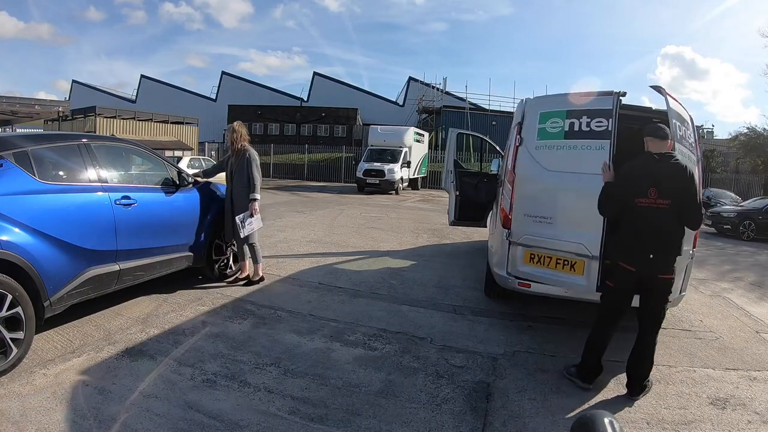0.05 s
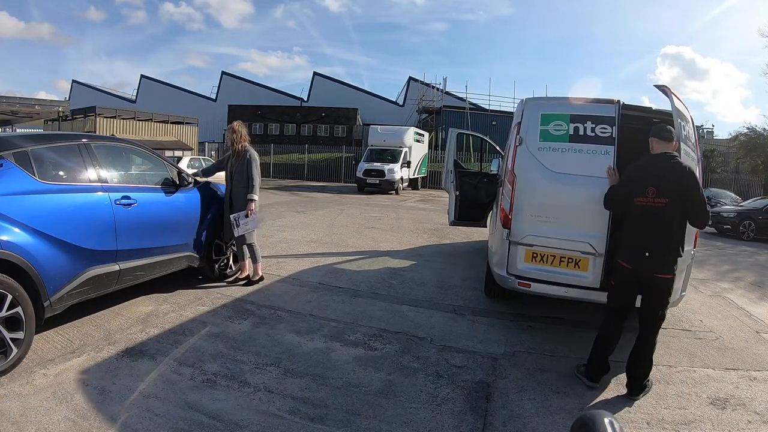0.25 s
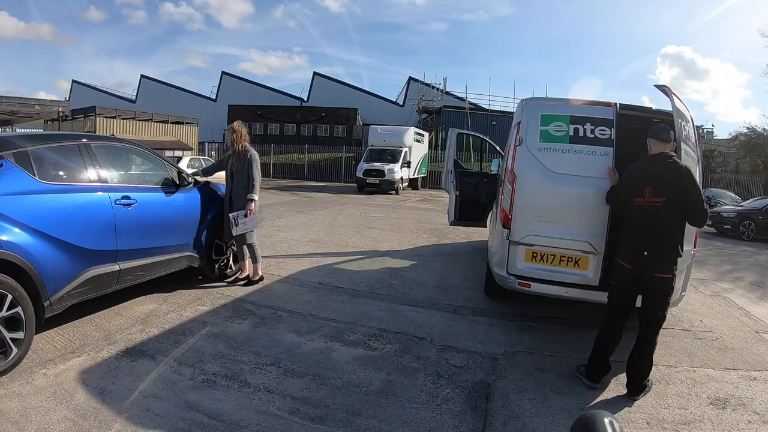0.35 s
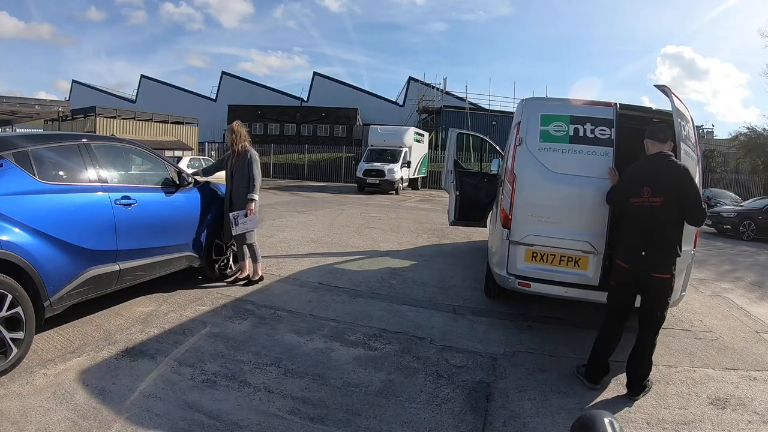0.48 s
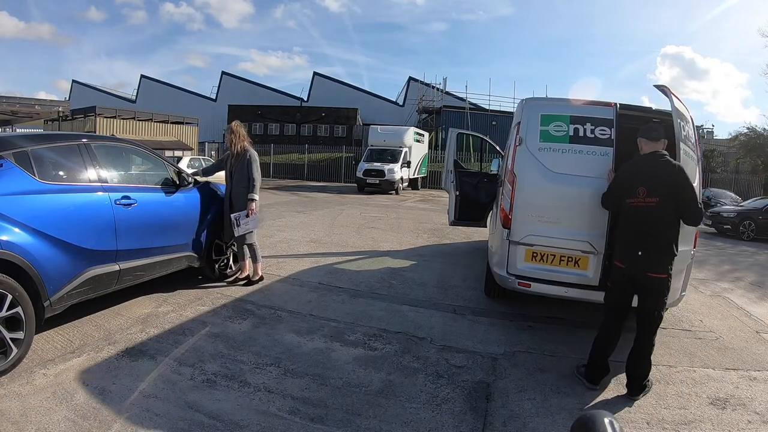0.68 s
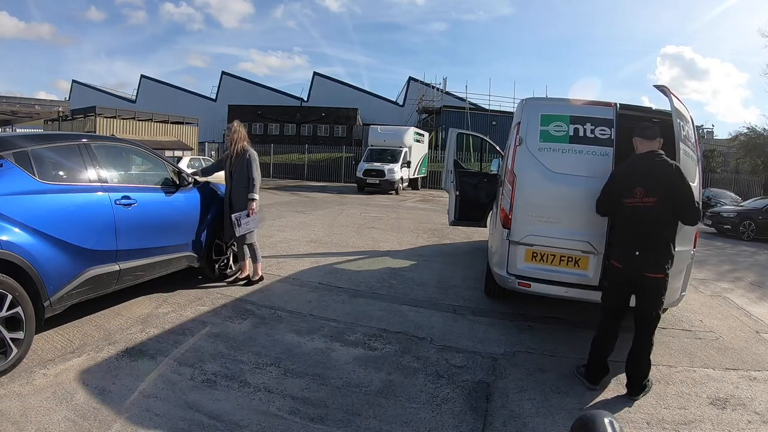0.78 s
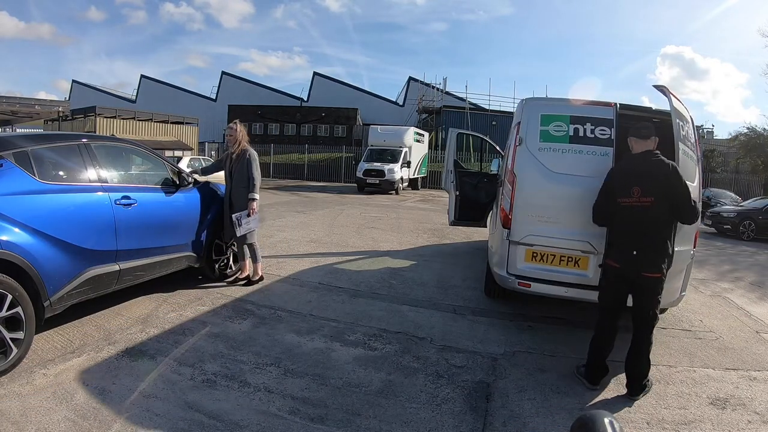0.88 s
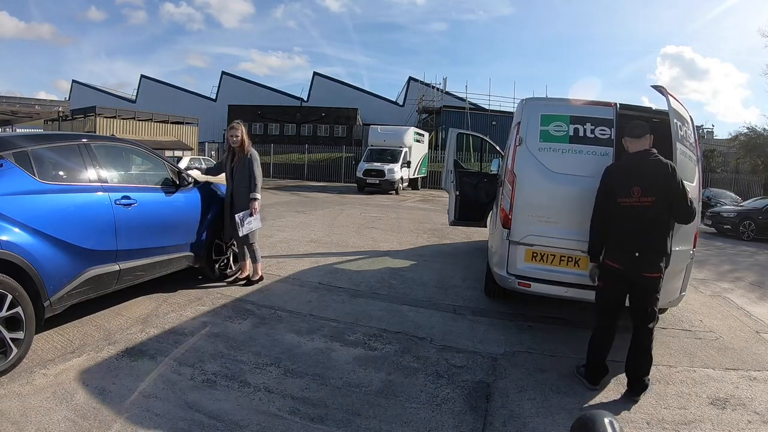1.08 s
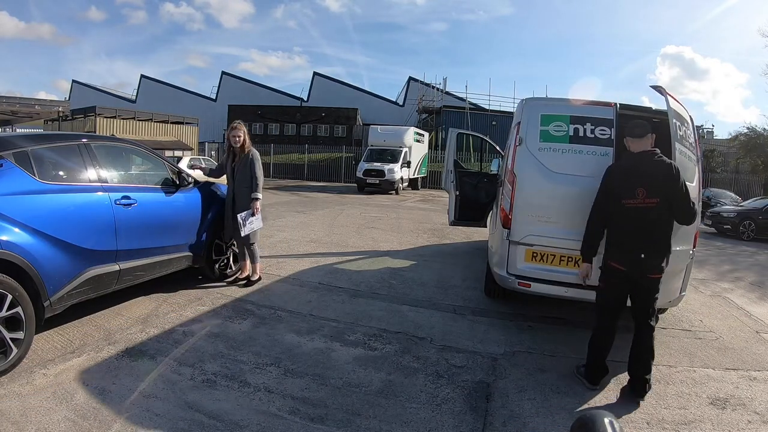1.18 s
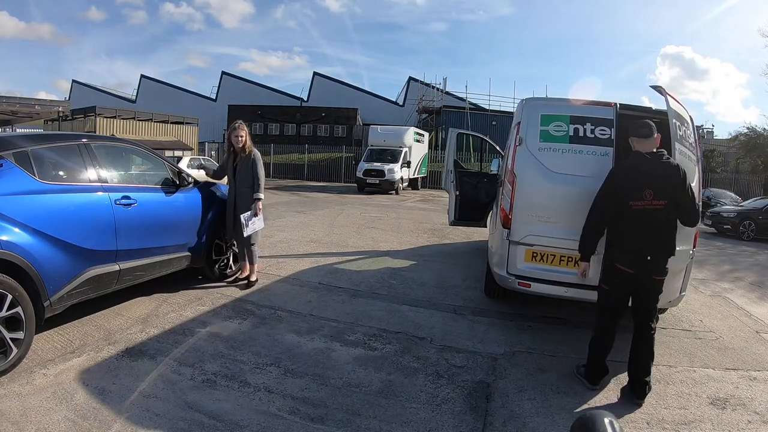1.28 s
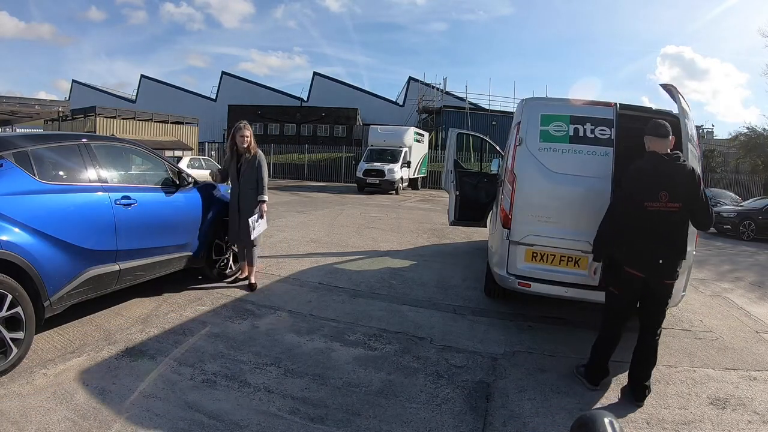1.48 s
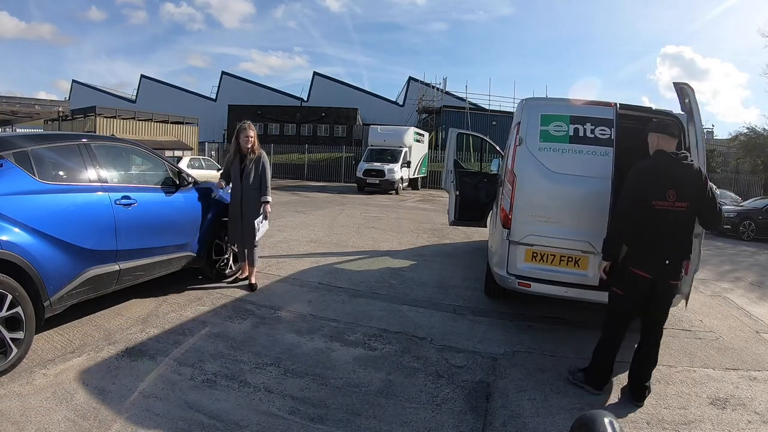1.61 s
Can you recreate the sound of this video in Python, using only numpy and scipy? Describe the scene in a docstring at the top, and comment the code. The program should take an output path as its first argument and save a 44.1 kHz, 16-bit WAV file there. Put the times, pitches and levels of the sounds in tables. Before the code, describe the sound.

A van's rear door slams in an open yard. Low engine hum, one motor falling in pitch, and distant traffic run throughout. Two faint metallic ticks come around 0.2 s, then at 0.33 s a sharp latch crack bursts into a deep, hollow boom with ringing, rattling steel, slightly right, fading by about 0.9 s. The ducked background creeps back; a very soft scuff comes near 1.56 s.

```python
"""Van door slammed in an open yard

A slowing engine, an idling one and distant traffic are wavering tones and coloured noise.
Two light handle ticks and a fainter third precede the latch's crack: decaying noise bursts and modes.
The load space booms and the panels ring as damped sines, to the right; the shell rattles as banded noise.
A soft scuff follows; the recorder's gain ducks at the slam and creeps back."""
import sys
import numpy as np
from scipy import signal
from scipy.fft import rfft, irfft
from scipy.io import wavfile
from scipy.ndimage import uniform_filter1d

SR = 44100
rng = np.random.default_rng(int(sys.argv[2]) if len(sys.argv) > 2 else 0)


def persist_wave(psi):
    """Save psi, clipped to +-1, as 16-bit WAV."""
    counts = np.round(np.clip(psi, -1, 1) * 32767).astype(np.int16)
    wavfile.write(sys.argv[1], SR, np.atleast_2d(counts).T)


N = 72765  # length in samples

# Levels in dB are nominal: before the onset envelopes and the recorder. Colours in dB per Hz are relative.

# A vehicle losing revs. Each row: time in seconds, firing frequency in Hz, level in dB.
SLOWING_ENGINE = [(0, 99.2, -38.5), (0.219, 86.14, -28), (0.291, 84.7, -37.5), (0.601, 73.55, -24),
                  (0.781, 68.6, -28.5), (.95, 63.9, -32), (1.249, 67.5, -27), (1.45, 66, -37.5),
                  (1.65, 55.4, -36)]
# Hum of an idling engine. Each row: frequency in Hz, level in dB.
IDLING_ENGINE = [(129.5, -34.5), (256, -56.5), (309, -51), (618, -68)]
# Spread of both engines' pitch (fraction of the frequency) and level (dB).
HUM_WAVER, HUM_FLUTTER_DB = 0.0078, 1.5
# Colour of distant traffic. Each row: frequency in Hz, density in dB per Hz.
TRAFFIC_COLOUR = [(20, -8.5), (35, 0), (70, -0.5), (140, -4), (200, -12), (320, -18), (550, -25.5),
                  (1100, -23.5), (2000, -31), (2700, -39), (3400, -41), (4600, -49.5), (6200, -43),
                  (8000, -54.5), (14000, -67)]
TRAFFIC_DB, SWELL_DB = -32, 1.09  # level, and the spread of its slow swell
# Stereo balance of the yard. Each row: frequency in Hz, left minus right in dB.
YARD_BALANCE = [(100, -1), (300, -4), (700, -6), (1500, -2), (4200, -2.5), (7000, 0)]
# Likeness of the yard's two sides. Each row: frequency in Hz, likeness from 0 to 1.
YARD_LIKENESS = [(50, .55), (240, 0.95), (470, .67), (920, 0), (1800, .05), (3600, 0.6), (7000, 0.2)]

# Light ticks of the door hardware. Each row: start in seconds, level in dB, t60 in seconds.
HARDWARE_TICKS = [(0.1753, -28.5, 0.0057), (0.2, -29.5, 0.0073), (.213, -49, 0.028)]
# Colour of the ticks. Each row: frequency in Hz, density in dB per Hz.
TICK_COLOUR = [(1000, -17.5), (2500, -2), (4000, -8.5), (6300, 5.5), (8000, -7.5), (14000, -33.5)]
TICK_TAIL_DB, TICK_TAIL_T60 = -26.5, 0.2  # tail level relative to its tick, and decay in seconds

# Metal contacts of the closing latch.
# Each row: start in seconds, bright click level in dB, clack level in dB, t60 in seconds.
LATCH_CONTACTS = [(.3310, -20.5, -22, 0.027), (.3370, -18, -19, 0.022), (0.3395, -28, -13, .026),
                  (0.3475, -20, -23, .03)]
# Colour of the bright click. Each row: frequency in Hz, density in dB per Hz.
CLICK_COLOUR = [(1500, -2), (3500, -2.5), (5000, -7.5), (6300, 3.5), (7400, 3.5), (9000, -21), (14000, -22)]
# Colour of the lower clack. Each row: frequency in Hz, density in dB per Hz.
CLACK_COLOUR = [(300, -1), (650, 6), (900, -15), (1050, -1), (1200, -11), (1420, -1.5), (1730, 3),
                (1950, -5), (2300, -8.5), (2700, -5.5), (3400, -0.5), (5000, -16.5), (12000, -44.5)]
# Modes of the striker and door frame. Each row: frequency in Hz, level in dB, t60 in seconds.
STRIKER_MODES = [(632, -21.5, 0.12), (1051, -22.5, 0.13), (1429, -17.5, .09), (1734, -18, 0.043),
                 (2305, -20, 0.079), (3376, -24.5, 0.058), (6550, -30, 0.1), (7100, -27, 0.044)]
STRIKER_START_S, STRIKER_RISE_S = 0.3412, 0.00078

# Modes of the load space's air and the door leaf. Each row: frequency in Hz, level in dB, t60 in seconds.
BOOM_MODES = [(42.2, -4.5, 0.82), (80.04, -3, 0.6), (105.1, 5, 0.29), (112.37, 5.5, 0.2),
              (137.6, -10, 0.46), (151.2, -7, 0.44)]
BOOM_START_S, BOOM_RISE_S = 0.3327, 0.028
# Modes of the body's steel panels. Each row: frequency in Hz, level in dB, t60 in seconds.
PANEL_MODES = [(185.5, -18.5, .36), (206.2, -18.5, .33), (226, -15, 0.33), (253.5, -11.5, 0.35),
               (279.8, -8, .3), (304.3, -7, 0.36), (343.6, -5, 0.28), (388, -9.5, 0.31), (404.2, -9, 0.34),
               (448, -15, 0.13), (475.2, -12, 0.3), (511.3, -16.5, 0.39), (560.6, -13.5, .23),
               (611.5, -16.5, .22)]
PANEL_START_S, PANEL_RISE_S = 0.3378, 0.018

# Colour of the dense ringing of shell and fittings. Each row: frequency in Hz, density in dB per Hz.
SHELL_COLOUR = [(40, -4.5), (100, -0.5), (190, 0), (300, 2), (550, -9), (750, -13.5), (1000, -14.5),
                (1600, -17.5), (2500, -23), (3500, -25), (4800, -31.5), (6500, -25.5), (8000, -32),
                (14000, -52.5)]
# Decay of the shell. Each row: frequency in Hz, t60 in seconds.
SHELL_T60 = [(60, 0.65), (250, 0.46), (500, 0.37), (1000, .39), (3000, 0.34), (10000, 0.32)]
SHELL_START_S, SHELL_RISE_S = 0.337, 0.011
SHELL_DB, RATTLE_DB = -5.5, 1.5  # level, and the spread of the rattle
# The yard's echo: delay in seconds, level relative to the shell in dB, rise in seconds.
ECHO_DELAY_S, ECHO_DB, ECHO_RISE_S = 0.042, -5.5, 0.014

# Stereo balance of the door. Each row: frequency in Hz, left minus right in dB.
DOOR_BALANCE = [(100, -1), (300, -3.5), (500, -6), (850, -9), (1450, -4), (2500, -3), (4200, -3),
                (7000, 0.53)]
# Likeness of the door's two sides. Each row: frequency in Hz, likeness from 0 to 1.
DOOR_LIKENESS = [(60, .85), (200, 0.97), (470, .92), (950, 0.23), (1800, .6), (3600, .75), (7000, 0.17)]

# Colour of a soft scuff of a shoe or sleeve. Each row: frequency in Hz, density in dB per Hz.
SCUFF_COLOUR = [(400, -10), (1000, 0.5), (1700, 7), (2400, -2.5), (3300, 1.5), (4600, -16), (6500, -2.5),
                (8000, -15.5), (14000, -35)]
SCUFF_CENTRE_S, SCUFF_WIDTH_S, SCUFF_DB = 1.563, 0.026, -47.5

# Gain control: threshold, recovery rate, and span of the power average in seconds.
LIMIT_DB, RECOVER_DB_PER_S, DETECT_S = -10.5, 9, 0.015
MIC_EDGE_HZ, MIC_LEAK_DB = 7610, -9  # edge of the dull top, and the gain above it
TREBLE_CUT_HZ = 14900


def undb(db):
    """Amplitude ratio: twenty decibels make a factor of ten."""
    return 10 ** (np.asarray(db) / 20)


def at(points, hz):
    """Logarithmic frequency scale: a table is interpolated linearly along it."""
    table_hz, values = np.array(points, float).T
    return np.interp(np.log(np.maximum(hz, 1)), np.log(table_hz), values)


def since(start):
    """Causality: elapsed seconds are zero until the start."""
    return np.maximum(np.arange(N) / SR - start, 0)


def ring(start, rise, t60):
    """Exponential build-up and decay: the decay factor falls by 60 dB in each t60."""
    age = since(start)
    build_up = 1 - np.exp(-age / rise)
    decay = np.exp(-np.log(1000) * age / t60)
    return build_up * decay


def pan(db):
    """Interaural level difference: half is given to each side with opposite sign."""
    return undb(np.array([[1], [-1]]) * db / 2)


def walk(rate):
    """Low-passed random fluctuation: noise averaged twice over 1/rate seconds, with a spread of one."""
    width = max(int(SR / rate), 1)
    once = uniform_filter1d(rng.standard_normal(N), width, mode="wrap")
    twice = uniform_filter1d(once, width, mode="wrap")
    return twice / twice.std()


def noise(colour, balance, likeness):
    """Random-phase synthesis: mid and side set the likeness of two channels of unit overall level."""
    hz = np.fft.rfftfreq(N, 1 / SR)
    mid, side = np.exp(2j * np.pi * rng.random((2, len(hz))))
    alike = np.clip(at(likeness, hz), -1, 1)
    both = np.sqrt(1 + alike) * mid + np.sqrt(1 - alike) * side * np.array([[1], [-1]])
    audible = hz > 20
    spectrum = both * undb(at(colour, hz)) * pan(at(balance, hz)) * audible
    x = irfft(spectrum, N)
    return x / x.std()


def modes(table, start, rise, balance):
    """Modal superposition: damped sines set ringing by one push."""
    total = 0
    for hz, db, t60 in table:
        tone = np.sin(2 * np.pi * hz * since(start))
        total = total + undb(db) * ring(start, rise, t60) * tone * pan(at(balance, hz))
    return total


def hum(hz, db):
    """Frequency and amplitude modulation: one engine tone wavers in pitch and level."""
    unsteady_hz = hz * (1 + HUM_WAVER * walk(11))
    phase = 2 * np.pi * np.cumsum(unsteady_hz) / SR
    level = np.sqrt(2) * undb(db + HUM_FLUTTER_DB * walk(19.4))  # table levels are RMS
    return level * np.sin(phase) * pan(at(YARD_BALANCE, np.mean(hz)))


def slowing_engine():
    """Periodic firing: the tone follows the firing frequency as the revs fall overall."""
    times, hz, db = np.array(SLOWING_ENGINE).T
    return hum(np.interp(since(0), times, hz), np.interp(since(0), times, db))


def idling_engine():
    """Additive synthesis: several steady-centred tones waver independently."""
    return sum(hum(hz, db) for hz, db in IDLING_ENGINE)


def traffic():
    """Incoherent summation: many far sources merge into coloured noise that swells gently."""
    level = undb(TRAFFIC_DB + SWELL_DB * walk(11.3))
    return level * noise(TRAFFIC_COLOUR, YARD_BALANCE, YARD_LIKENESS)


def yard():
    """Superposition: the two engines and the traffic add."""
    return slowing_engine() + idling_engine() + traffic()


def ticks(rise=0.00048):
    """Impulsive excitation: each dry noise click decays quickly above a faint longer tail."""
    level = 0
    for start, db, t60 in HARDWARE_TICKS:
        tail = undb(TICK_TAIL_DB) * ring(start, rise, TICK_TAIL_T60)
        level = level + undb(db) * (ring(start, rise, t60) + tail)
    return level * noise(TICK_COLOUR, DOOR_BALANCE, DOOR_LIKENESS)


def latch(rise=0.00064):
    """Impact excitation: the catch hits the striker and snaps over it, and the striker's modes ring."""
    click = noise(CLICK_COLOUR, DOOR_BALANCE, DOOR_LIKENESS)
    clack = noise(CLACK_COLOUR, DOOR_BALANCE, DOOR_LIKENESS)
    contacts = 0
    for start, click_db, clack_db, t60 in LATCH_CONTACTS:
        impact = undb(click_db) * click + undb(clack_db) * clack
        contacts = contacts + ring(start, rise, t60) * impact
    return contacts + modes(STRIKER_MODES, STRIKER_START_S, STRIKER_RISE_S, DOOR_BALANCE)


def boom():
    """Cavity resonance: the air of the load space and the door leaf ring at low modes."""
    return modes(BOOM_MODES, BOOM_START_S, BOOM_RISE_S, DOOR_BALANCE)


def panels():
    """Plate vibration: the steel panels ring at their damped modes."""
    return modes(PANEL_MODES, PANEL_START_S, PANEL_RISE_S, DOOR_BALANCE)


def shell(rattle_rate=500):
    """High modal density: noise decays octave by octave, with the yard's echo as later energy."""
    spectrum = rfft(noise(SHELL_COLOUR, DOOR_BALANCE, DOOR_LIKENESS))
    octave = np.log2(np.clip(np.fft.rfftfreq(N, 1 / SR), 62.5, 8000) / 62.5)
    rattle = undb(RATTLE_DB * walk(rattle_rate))
    total = 0
    for k in range(8):
        centre_hz = 62.5 * 2 ** k
        t60 = at(SHELL_T60, centre_hz)
        overlap = np.maximum(1 - abs(octave - k), 0)  # neighbouring bands sum to one
        band = irfft(spectrum * overlap, N)
        direct = ring(SHELL_START_S, SHELL_RISE_S, t60)
        if centre_hz > rattle_rate * 1.4:  # only the upper bands rattle
            direct = direct * rattle
        echo = undb(ECHO_DB) * ring(SHELL_START_S + ECHO_DELAY_S, ECHO_RISE_S, t60)
        total = total + band * np.hypot(direct, echo)  # the powers add
    return undb(SHELL_DB) * total


def door():
    """Superposition: one slam excites latch, load space, panels and shell."""
    return latch() + boom() + panels() + shell()


def scuff():
    """Friction noise: a brief soft rub swells and fades as a Gaussian beside the door."""
    swell = np.exp(-((since(0) - SCUFF_CENTRE_S) / SCUFF_WIDTH_S) ** 2)
    return undb(SCUFF_DB) * swell * noise(SCUFF_COLOUR, DOOR_BALANCE, DOOR_LIKENESS)


def scene():
    """Superposition: yard, ticks, door and scuff add in the air."""
    return yard() + ticks() + door() + scuff()


def record(dry):
    """Filtering and compression: a dull top, gain that ducks at once and recovers slowly, a treble cut."""
    low_pass = signal.ellip(8, .5, 60, MIC_EDGE_HZ, fs=SR, output="sos")
    high_pass = signal.butter(4, MIC_EDGE_HZ, "high", fs=SR, output="sos")
    below = signal.sosfilt(low_pass, dry)
    above = signal.sosfilt(high_pass, dry)
    x = below + undb(MIC_LEAK_DB) * above
    power = uniform_filter1d(np.mean(x ** 2, axis=0), max(int(DETECT_S * SR), 1))
    over_db = np.maximum(10 * np.log10(abs(power) + 1e-12) - LIMIT_DB, 0)
    # The running maximum holds the deepest reduction while the recovery ramp releases it.
    recovery_db = RECOVER_DB_PER_S * since(0)
    gain_db = recovery_db - np.maximum.accumulate(over_db + recovery_db)
    treble_cut = signal.ellip(8, .2, 70, TREBLE_CUT_HZ, fs=SR, output="sos")
    return signal.sosfilt(treble_cut, x * undb(gain_db))


dry = scene()
out = record(dry)
persist_wave(out)
```